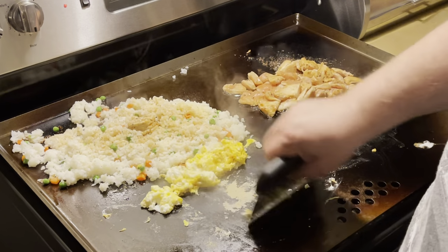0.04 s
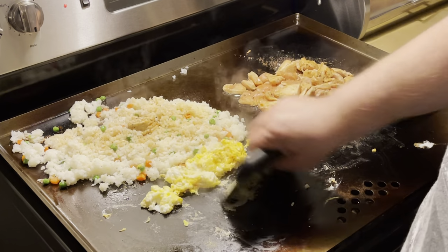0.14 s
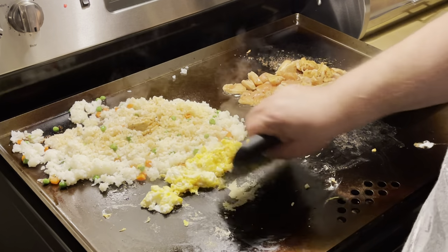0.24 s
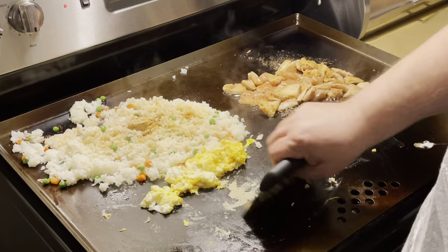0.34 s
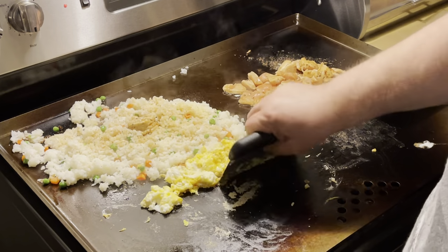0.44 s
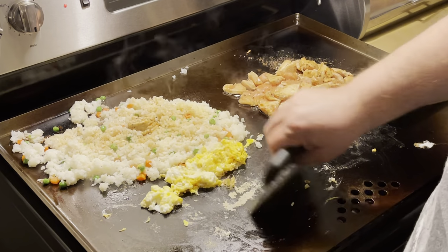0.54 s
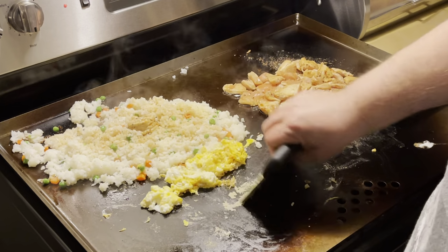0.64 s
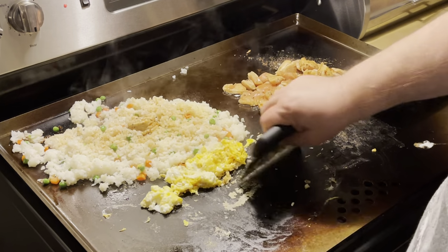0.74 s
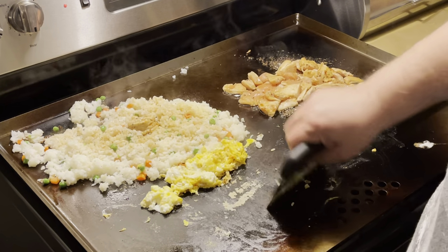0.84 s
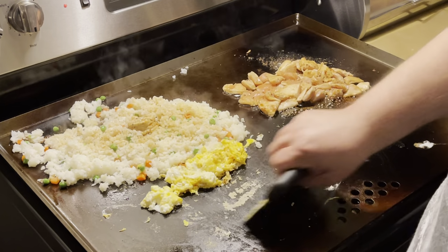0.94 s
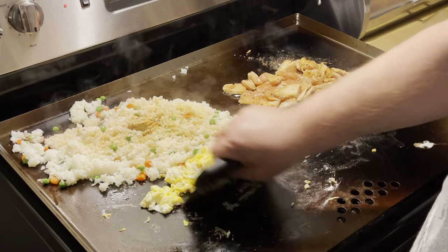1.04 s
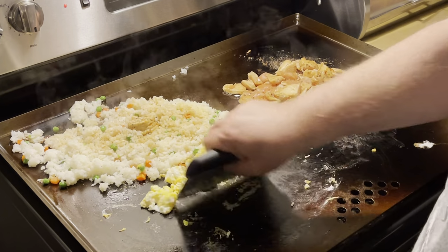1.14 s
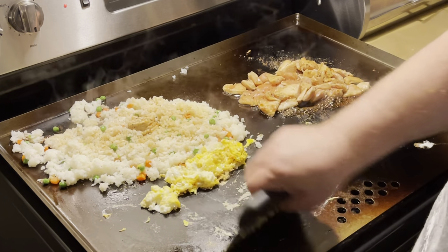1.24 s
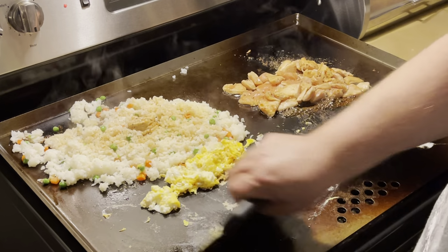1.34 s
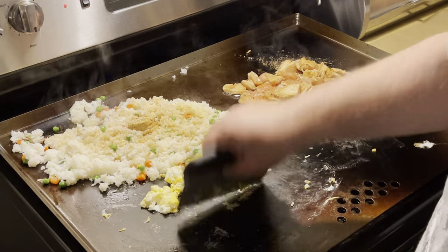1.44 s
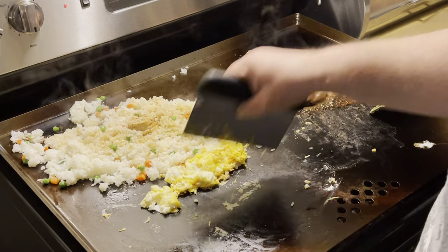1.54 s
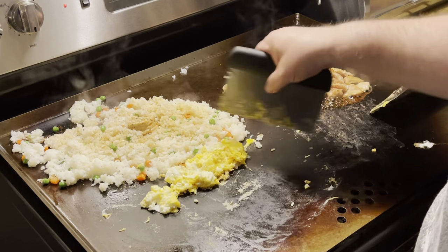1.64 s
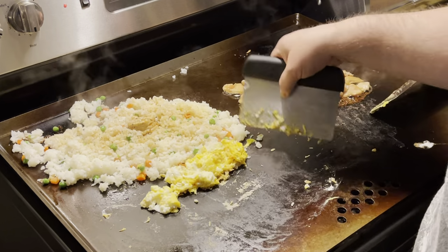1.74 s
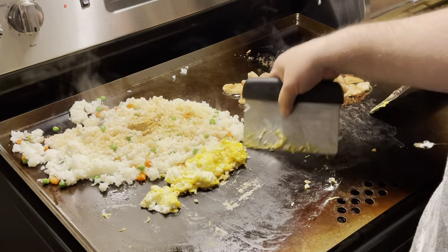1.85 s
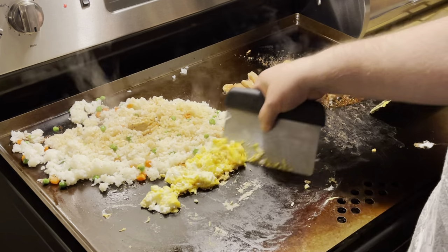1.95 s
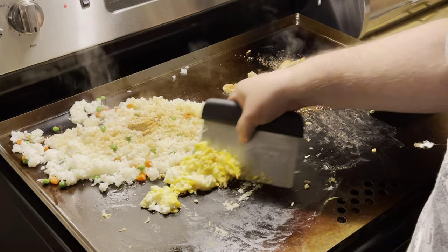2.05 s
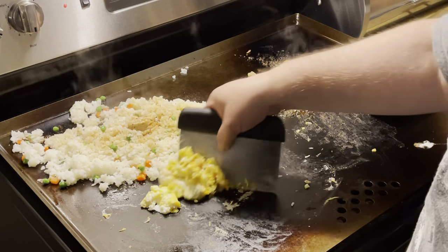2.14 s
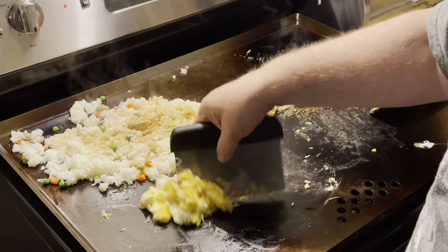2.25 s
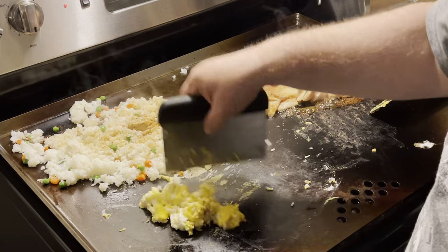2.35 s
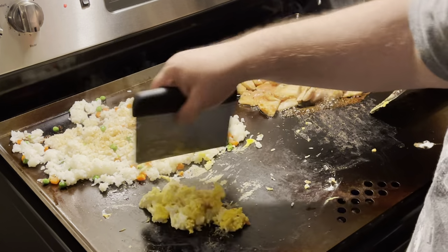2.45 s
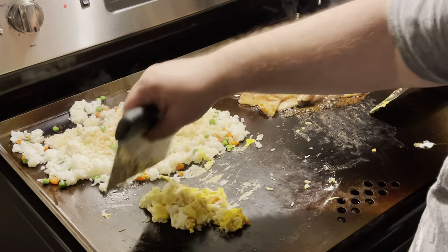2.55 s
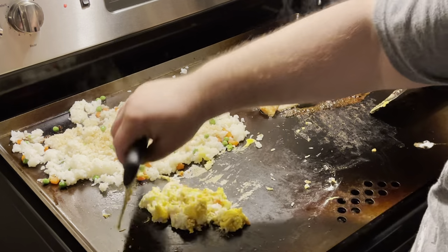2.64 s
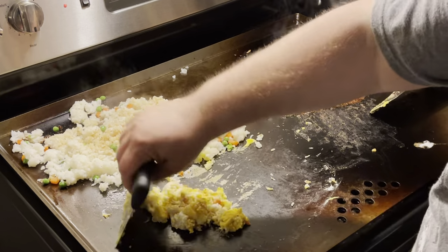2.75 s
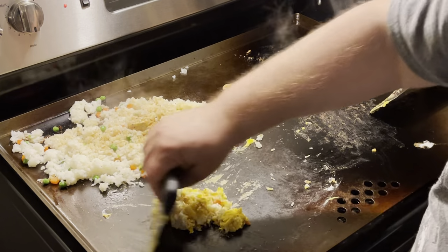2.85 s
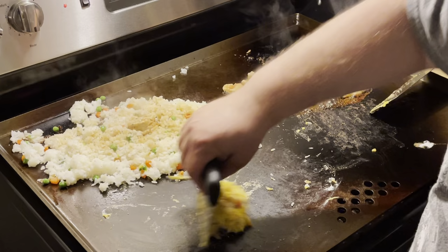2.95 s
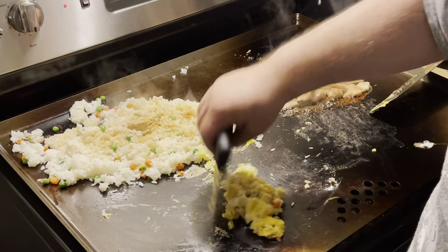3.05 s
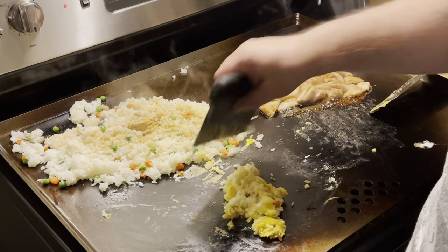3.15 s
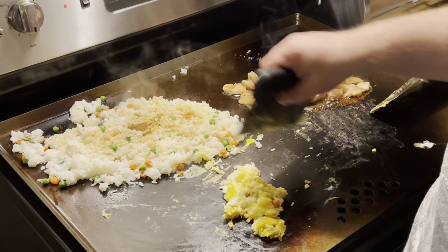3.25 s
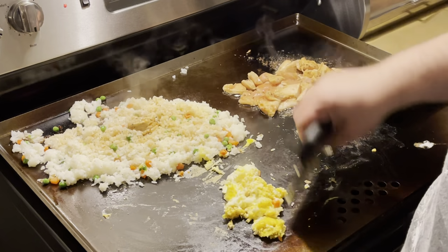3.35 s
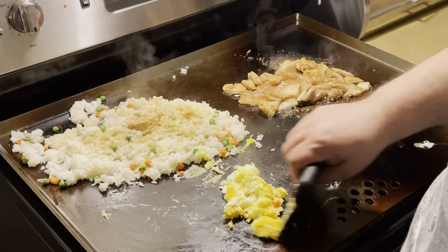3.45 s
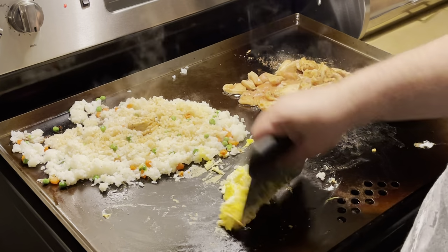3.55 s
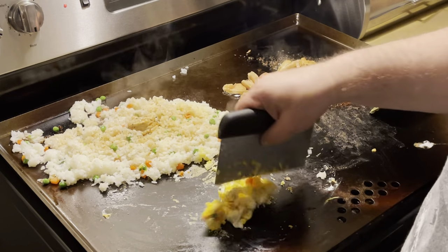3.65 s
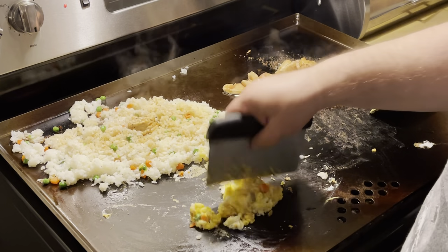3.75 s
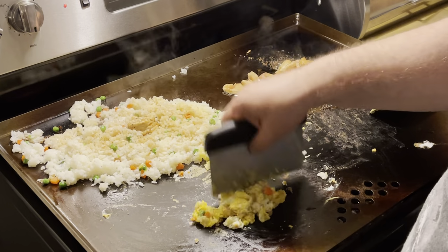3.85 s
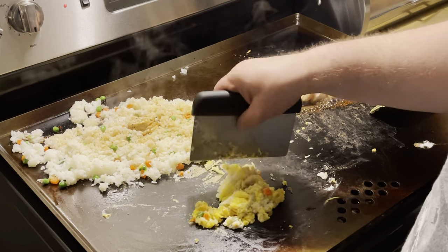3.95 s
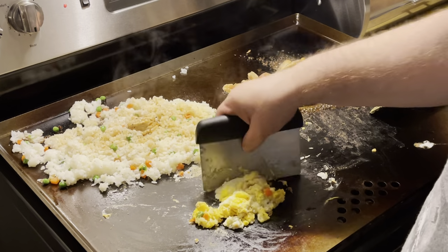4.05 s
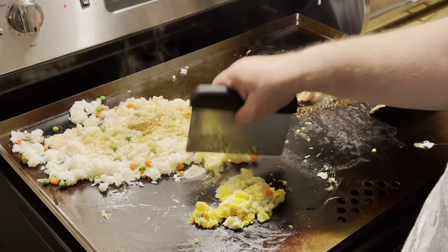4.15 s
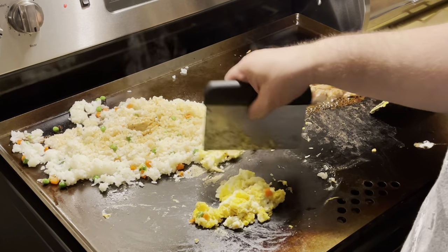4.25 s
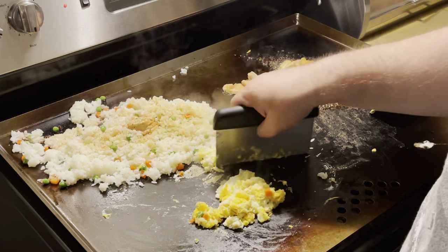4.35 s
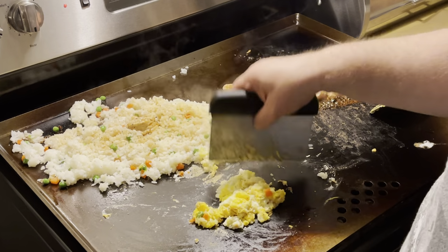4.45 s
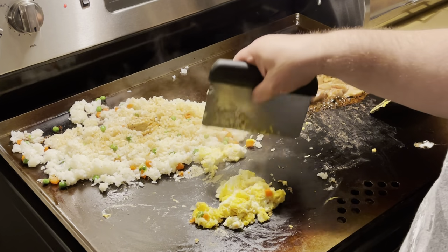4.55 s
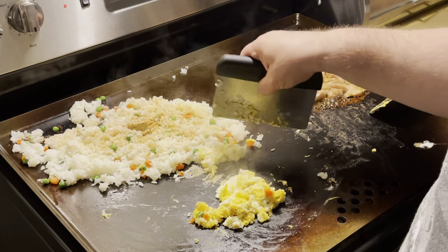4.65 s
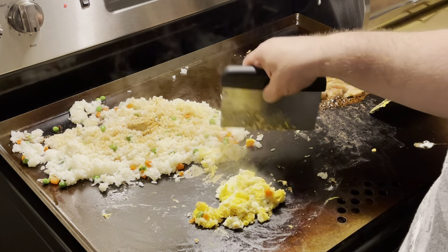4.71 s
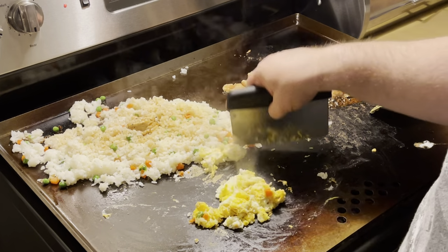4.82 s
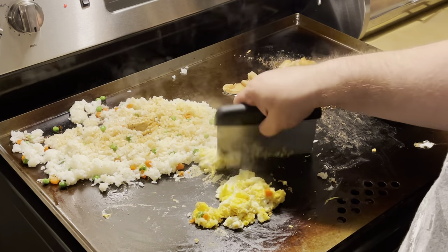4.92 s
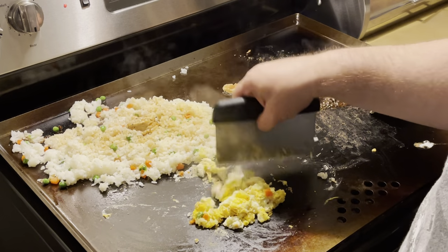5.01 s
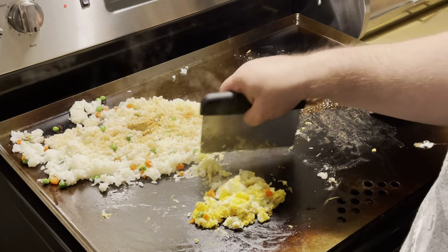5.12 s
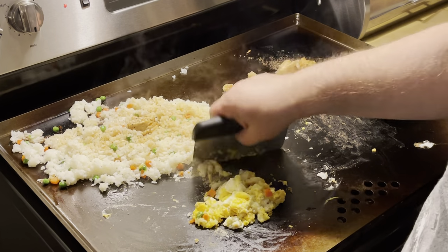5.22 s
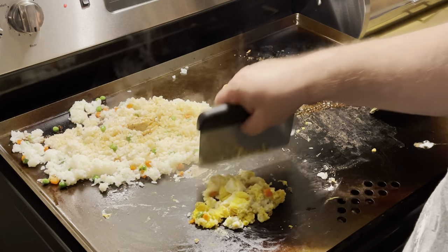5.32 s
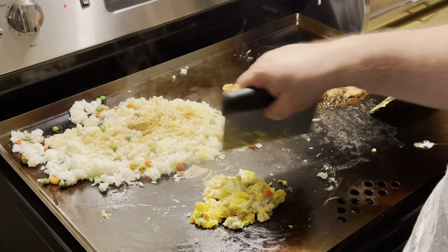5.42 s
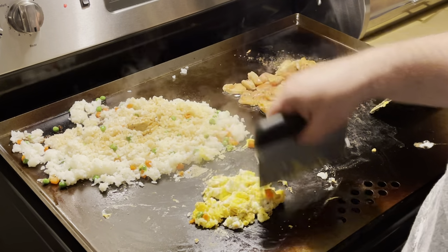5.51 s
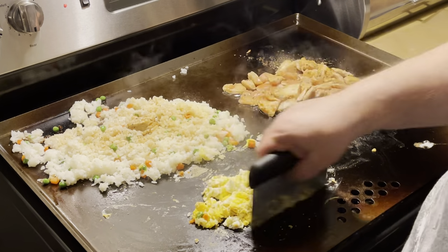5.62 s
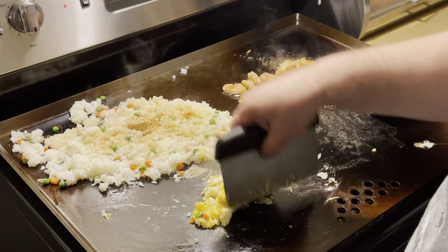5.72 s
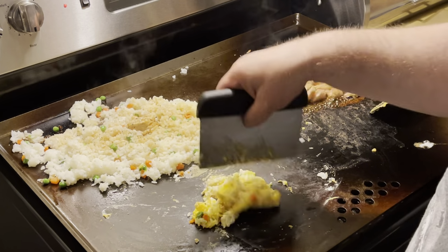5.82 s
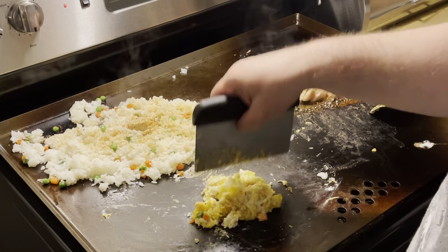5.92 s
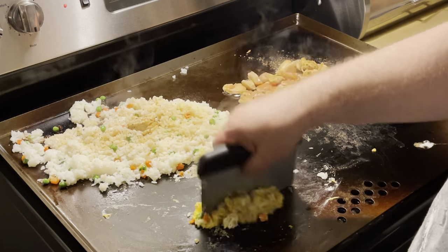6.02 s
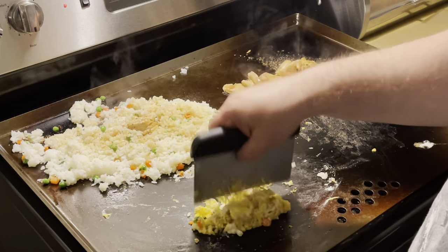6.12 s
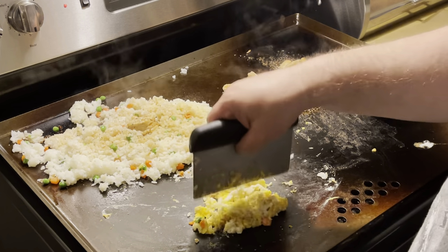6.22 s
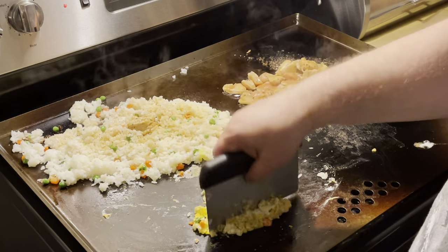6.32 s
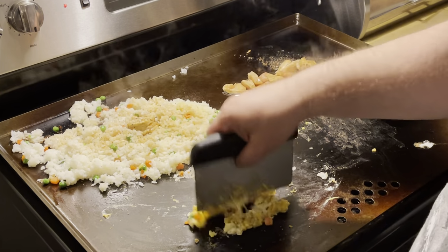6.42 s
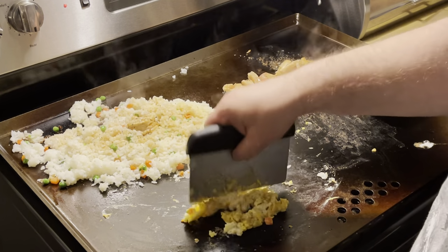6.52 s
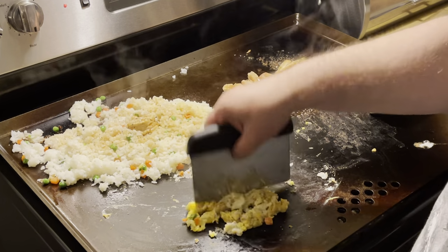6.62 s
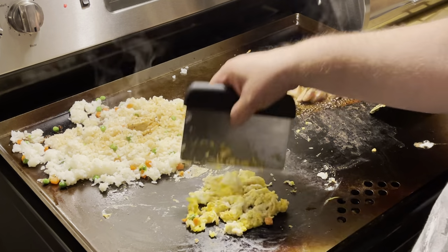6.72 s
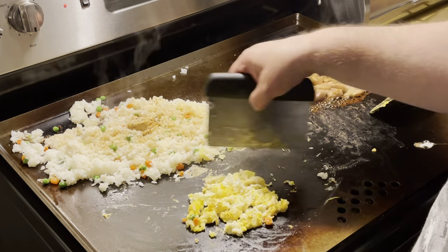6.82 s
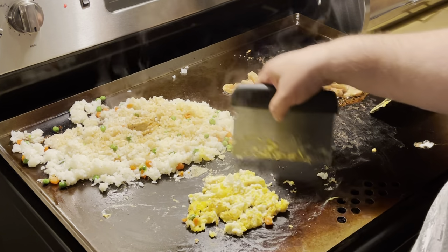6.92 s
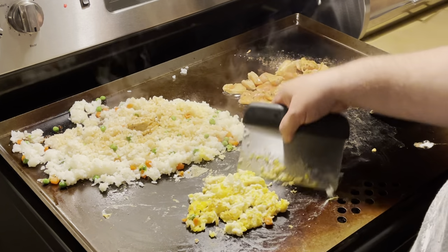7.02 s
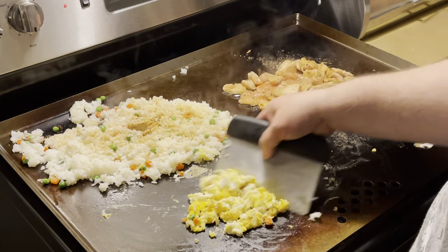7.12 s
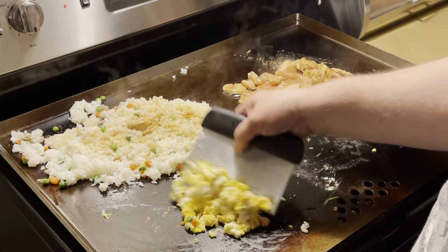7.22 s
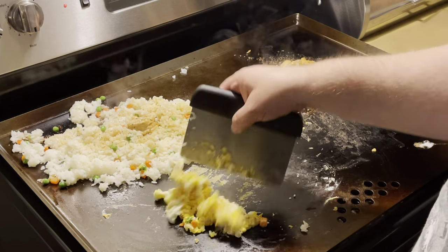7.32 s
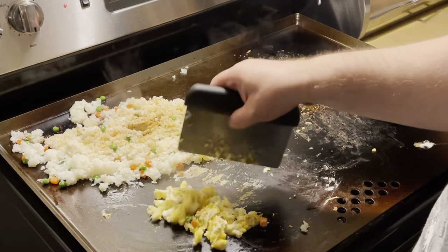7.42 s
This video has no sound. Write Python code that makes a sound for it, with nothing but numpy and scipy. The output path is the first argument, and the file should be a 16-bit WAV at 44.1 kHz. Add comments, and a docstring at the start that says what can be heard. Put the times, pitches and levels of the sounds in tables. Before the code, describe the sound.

Close up in a kitchen, a metal scraper taps and rasps on a hot steel griddle over a steady fine sizzle. Quick lighter chops and short scrapes come first, then a soft push through egg and a flare of frying. After a pause, much harder clanking chops follow at uneven intervals, some doubled, ending with one soft knock and push.

```python
"""A steel scraper chops, scrapes and pushes egg across a hot griddle, close by in a kitchen.
It opens with chops and short scrapes; pushes through egg, click trains in blade resonances, come near 2 s.
The sizzle, dense random clicks, flares as wet egg meets fresh hot steel, most at 2.25 s, and boils off.
From 3.4 to 6.6 s come the hardest chops: noise bands and dying modes, often twice as a corner lands first.
Gain control ducks the sizzle after the hardest; one soft chop and a push end it over fan and rumble."""
import sys
import numpy as np
from scipy import signal
from scipy.fft import rfft, irfft, next_fast_len
from scipy.io import wavfile
from scipy.ndimage import uniform_filter1d, minimum_filter1d

SR = 44100
rng = np.random.default_rng(int(sys.argv[2]) if len(sys.argv) > 2 else 0)


def unload_wav(signal):
    """Save mono or channel-first audio to the path in sys.argv[1] as 16-bit WAV at rate SR, clipped to [-1, 1]."""
    wavfile.write(
        sys.argv[1],
        SR,
        np.round(np.clip(np.atleast_2d(signal).T, -1, 1) * 32767).astype(np.int16),
    )


N = 329415  # samples, about 7.5 s
TIME = np.arange(N) / SR


def gain_of(db):
    """Decibels to an amplitude factor."""
    return 10 ** (np.asarray(db) / 20)


def evened(x):
    """Scales to rms 1."""
    return x / np.sqrt(np.mean(x ** 2) + 1e-20)


def read(points, hz):
    """Reads a (Hz, value) table on a log-frequency axis."""
    f, value = np.transpose(points)
    return np.interp(np.log(hz + 1), np.log(f + 1), value)


def level(curve):
    """A (s, dB) curve as a gain for every sample."""
    return gain_of(np.interp(TIME, *np.transpose(curve)))


def add(mix, s, sound):
    """Mixes a sound in at time s, cut off at the end of the mix."""
    part = mix[:, max(round(s * SR), 0):][:, :sound.shape[-1]]
    part += sound[..., :part.shape[-1]]


# stereo width: freq_hz, side_minus_mid_db
SPREAD = [(100, -28), (300, -11), (600, -9), (1400, -6), (2200, -23), (9000, -26.5), (13000, -27)]


def coloured(pair, spectrum):
    """Two unrelated signals become mid and side of a stereo sound of rms 1 with the given spectrum."""
    size = pair.shape[-1]
    padded = next_fast_len(size)
    hz = np.fft.rfftfreq(padded, 1 / SR)
    mid, side = rfft(pair, padded) * gain_of(read(spectrum, hz))
    side = side * gain_of(read(SPREAD, hz))
    left_right = np.array([mid + side, mid - side])
    return evened(irfft(left_right, padded)[:, :size])


def grains(per_s, scatter_db):
    """Two trains of tiny clicks at random times; scatter_db makes their sizes more uneven."""
    size = gain_of(scatter_db * np.minimum(rng.exponential(1, (2, N)), 5))
    height = size * rng.standard_normal((2, N))
    happens = rng.random((2, N)) < per_s / SR
    return evened(height * happens)


def waver(per_s):
    """Random drift of rms 1: straight lines between per_s chance values a second."""
    return evened(np.interp(TIME * per_s, np.arange(4000), rng.standard_normal(4000)))


def bands_of(x, count=18):
    """Splits a sound into overlapping bands that sum to it: (centre Hz, band) pairs."""
    centres = np.geomspace(60, 15000, count)
    hz, z = np.fft.rfftfreq(x.shape[-1], 1 / SR), rfft(x)
    pairs = []
    for c in centres:
        weight = read(list(zip(centres, centres == c)), hz)
        pairs.append((c, irfft(z * weight)))
    return pairs


# extractor fan spectrum: freq_hz, density_db (per Hz)
FAN = [(60, -7), (105, 0), (135, 13), (200, -15.5), (290, 5), (420, -7), (800, -6.5), (1500, -6.5),
       (4000, -12)]
# low kitchen rumble over time: time_s, level_db (before rumble_db)
RUMBLE = [(0.0, -58), (0.48, -50.5), (1.27, -55.5), (1.5, -70.5), (3.91, -56), (7.47, -72.5)]
# rumble spectrum: freq_hz, density_db (per Hz)
RUMBLE_SHAPE = [(15, -23), (32, -48), (50, 7.5), (75, -2.5), (105, -22), (200, 0), (600, -56)]


def background(fan_db=-55, rumble_db=2, flutter_db=2):
    """The steady air of the extractor fan and a fluttering rumble, both shaped noise."""
    fan = gain_of(fan_db) * coloured(rng.standard_normal((2, N)), FAN)
    rumble = coloured(rng.standard_normal((2, N)), RUMBLE_SHAPE) * level(RUMBLE)
    return fan + rumble * gain_of(rumble_db + flutter_db * waver(26))


# wet egg lands on fresh hot steel: start_s, level_db (before the fizz and spit gains)
FLARES = [(-0.2, -50), (1.45, -52), (1.9, -51.5), (2.25, -46.8), (3.5, -51), (4.05, -53), (7.0, -54)]
SIMMER_DB, FLARE_RISE_S, BOIL_OFF_DB_PER_S = -53.1, .16, 6  # simmer also before those gains


def boiling():
    """How hard the food fries: a steady simmer plus flares that rise quickly and boil off slowly."""
    power = gain_of(SIMMER_DB) ** 2
    for start_s, level_db in FLARES:
        age = np.maximum(TIME - start_s, 0)
        rise = np.minimum(age / FLARE_RISE_S, 1)
        boil_off = gain_of(level_db - BOIL_OFF_DB_PER_S * (age - FLARE_RISE_S))
        power = power + rise * boil_off ** 2
    return np.sqrt(power)


# spectrum of tiny sharp bursts, for sizzle, pops and chop ticks: freq_hz, density_db (per Hz)
FRYING = [(300, -9.5), (1000, -16), (1900, -6.5), (2900, -3), (3800, -4.5), (6000, -2.5), (8500, -1),
          (11000, 5.5), (12000, 0.5), (13000, -40), (15500, -59), (16000, -57)]


def sizzle(fizz_db=5.0, spit_db=-9):
    """A fine fizz of bursting steam bubbles with sparser spits of fat."""
    fizz = gain_of(fizz_db) * coloured(grains(per_s=14000, scatter_db=0.0), FRYING)
    spits = gain_of(spit_db) * coloured(grains(per_s=530, scatter_db=1.0), FRYING)
    return (fizz + spits) * boiling() * gain_of(0.14 * waver(25))


# single pops of hot fat: start_s, level_db
POPS = [(2.1042, -27), (2.696, -28.5), (4.653, -27), (5.565, -30.5)]


def pops(decay_s=0.0021, size=2000):
    """A drop of fat bursts with a short bright tick of dying noise."""
    out = np.zeros((2, N))
    decay = np.exp(-np.arange(size) / SR / decay_s)
    for start_s, level_db in POPS:
        burst = coloured(rng.standard_normal((2, size)), FRYING)
        add(out, start_s, gain_of(level_db) * burst * decay)
    return out


def stroke(start_s, length_s, level_db, lean):
    """The hand speeds up and slows down in one arch; a lean under 1 brings the peak early."""
    progress = np.clip((TIME - start_s) / length_s, 0, 1)
    return gain_of(level_db) * np.sin(np.pi * progress ** lean)


def resonate(x, hz, width):
    """Shifts the curve hz down to zero, smooths, and shifts back: a moving resonance of gain 1."""
    turn = np.exp(2j * np.pi * np.cumsum(hz) / SR)
    r = np.exp(-np.pi * width / SR)
    smooth = signal.lfilter([1 - r], [1, -r], x / turn + 1e-18)
    return 2 * (turn * smooth).real


HUM_HZ, HUM_T60 = 433.5, .34  # low hum heard in slides and chops; t60 in s


def slide(strokes, spectrum, resonances, lean, catches_per_s, scatter_db, judder_db, ring_db, hum_db):
    """The edge judders and catches on specks; blade resonances wander and swell as the contact shifts."""
    force = np.sqrt(sum(stroke(*row, lean) ** 2 for row in strokes))
    catches = coloured(grains(catches_per_s, scatter_db), spectrum)
    rasp = catches * force * gain_of(judder_db * waver(110))
    wander, swell_db = .03, 3  # wander as a share of the resonance frequency
    blade = 0
    for hz, width_hz, level_db in resonances:
        swell = gain_of(level_db + swell_db * waver(22.07))
        moving_hz = hz * (1 + wander * waver(30))
        blade = blade + swell * resonate(rasp, moving_hz, width_hz)
    hum_width_hz = np.log(1000) / np.pi / HUM_T60
    hum = resonate(rasp, np.full(N, HUM_HZ), hum_width_hz)
    return rasp + gain_of(ring_db) * blade + gain_of(hum_db) * hum


# the edge sliding on a cushion of egg: start_s, length_s, level_db (before the -5.5 dB trim)
PUSHES = [(1.925, 0.23, -35), (2.09, 0.2, -38), (6.98, 0.19, -37)]
# rub on egg, spectrum: freq_hz, density_db (per Hz)
RUB = [(50, -10), (150, 3), (240, -4.5), (450, 1.5), (850, -6), (1500, -8.5), (3000, -5.5), (8000, -28)]
# resonances of the blade bedded in egg: freq_hz, width_hz, level_db (before ring_db and the trim)
BEDDED = [(160, 22, -1), (445, 23, -22), (810, 490, -5)]


def pushes():
    """Egg under the edge: sparser catches, a dull rub and low blade resonances."""
    return gain_of(-5.5) * slide(PUSHES, RUB, BEDDED, lean=.7, catches_per_s=3000,
                                 scatter_db=.8, judder_db=1.6, ring_db=4, hum_db=0)


# the edge sliding on bare steel: start_s, length_s, level_db (before the -4.3 dB trim)
SCRAPES = [(0.105, 0.11, -23.8), (0.945, 0.16, -25.8), (1.315, 0.13, -26), (1.935, 0.075, -41.5),
           (2.8, 0.13, -29.3), (2.885, 0.13, -26.2)]
# rasp on bare steel, spectrum: freq_hz, density_db (per Hz)
RASP = [(60, -32), (150, 9), (280, -12.5), (450, 6), (1400, -2), (3200, 2), (5800, -4), (7000, -1),
        (9500, 1), (11500, 3.5), (13000, -15), (16000, -88)]
# resonances of the pressed-down blade: freq_hz, width_hz, level_db (before ring_db and the trim)
PRESSED = [(1160, 120, -12), (2140, 180, -5.5), (3020, 230, -2.5), (3670, 230, -3.5), (5070, 290, 4.5),
           (5800, 290, 2), (7600, 400, -10)]


def scrapes():
    """Bare steel under the edge: dense catches, a bright rasp and high blade resonances."""
    return gain_of(-4.3) * slide(SCRAPES, RASP, PRESSED, lean=.9, catches_per_s=12000,
                                 scatter_db=.8, judder_db=1.16, ring_db=7, hum_db=3)


def bloom(t, hz, cycles=3.32):
    """Bending waves are slow in the bass: low notes take a few cycles to build up."""
    return 1 - np.exp(-(t * hz / cycles) ** 2)


def note(t, hz, t60):
    """One dying mode."""
    return bloom(t, hz) * gain_of(-60 * t / t60) * np.sin(2 * np.pi * (hz * t + rng.random()))


# ringing of the griddle with the blade on it: freq_hz, level_db (before colour and scatter), t60_s
MODES_OF_STEEL = [(156.4, -2, 0.26), (298.7, -8, 0.26), (500, -2, 0.059), (642.7, -3, 0.19),
                  (690.2, 0.5, 0.18), (883, 5, 0.096), (950, -2, 0.15), (1191, 3, 0.15), (1610, -20, 0.16),
                  (1694, -5, 0.18), (1884, 2.5, .13), (2143, 0, 0.18), (2215, 1.5, 0.12), (2338, -6, 0.33),
                  (2696, -7, 0.27), (2827, -2.5, 0.18), (3080, 7, 0.085), (3120, -14, .09),
                  (3550, 1.5, 0.077), (3710, -2.5, 0.11), (4110, 1, 0.079), (4740, -22, 0.1),
                  (4690, 4.5, 0.087), (5570, -1.5, 0.092)]
MODE_SCATTER_DB = 3


def steel(t, colour):
    """The modes ring with strengths and phases that depend on where the edge touches."""
    hz, db, t60 = np.transpose(MODES_OF_STEEL)[:, :, None]
    spot, turn = rng.standard_normal(hz.shape), rng.random(hz.shape)
    height = gain_of(db + read(colour, hz) + MODE_SCATTER_DB * spot - 60 * t / t60)
    modes = height * bloom(t, hz, cycles=5.7) * np.sin(2 * np.pi * (hz * t + turn))
    return modes.sum(0)


# the crowd of short-lived modes in a chop: freq_hz, density_db (per Hz)
CLANK = [(40, -19), (90, -16.5), (150, -8), (230, -6.5), (450, 1), (1300, -3.5), (2600, -1.5), (4500, -3.5),
         (6800, -10), (9500, -12), (11500, -7.5), (13000, -29.5), (16000, -51)]
# how long that crowd rings: freq_hz, t60_s
CLANK_T60 = [(100, 0.41), (300, 0.15), (900, 0.16), (2500, .11), (6000, 0.14), (12000, 0.11)]
RING_T60 = .11  # s, the blade's single note


def contact(strength_db, thud_db, body_db, edge_db, hum_db, ring_hz, clank_db=4, modes_db=-14.5,
            ring_db=-6, tick_db=-12, tick_s=0.00077, crack_db=-2, crack_s=0.0013, size=18000):
    """One contact: a sharp tick, a dense clank, the lasting modes, one note of the blade and the low hum."""
    t = np.arange(size) / SR
    # food under the edge lengthens the contact: more body, and the treble falls from a lower knee
    knee_hz = np.clip(4200 * 2 ** (-body_db / 13), 2800, 4900)
    colour = [(170, thud_db), (400, body_db), (900, body_db), (2000, 0), (knee_hz, 0), (1.8 * knee_hz, edge_db)]
    crowd = coloured(rng.standard_normal((2, size)), CLANK)
    clank = 0
    for hz, band in bands_of(crowd):
        fade_db = read(colour, hz) - 60 * t / read(CLANK_T60, hz)
        clank = clank + band * bloom(t, hz) * gain_of(fade_db)
    # a brief extra push at the very start of the clank
    crack = 1 + gain_of(crack_db) * np.exp(-t / crack_s)
    clank = gain_of(clank_db) * clank * crack / np.sqrt(2)
    burst = coloured(rng.standard_normal((2, size)), FRYING)
    tick = gain_of(tick_db + edge_db) * burst * np.exp(-t / tick_s)
    blade = gain_of(ring_db) * note(t, ring_hz, RING_T60)
    modes = gain_of(modes_db) * steel(t, colour)
    hum = gain_of(hum_db) * note(t, HUM_HZ, HUM_T60)
    return gain_of(strength_db) * (tick + clank + modes + blade + hum)


# one row a chop: start_s, strength_db, thud_db, body_db, edge_db (treble), hum_db, ring_hz (blade note)
# and, where a corner lands first, the rest of the edge: later_s, more_db (against the corner)
CHOPS = [(0.0715, -18.7, 1.5, 3.5, 3, -10, 1669, 0.013, 7),
         (0.3405, -15, 7, -3.5, 3.5, -11, 2900, 0.007, 3.5),
         (0.5815, -23, 6, -6, 3.5, -12, 2850, 0.0453, 10.5),
         (0.871, -25, 6.5, 0.5, 4, -7.5, 3500, 0.0085, 8), (1.2582, -22, 10.5, 2, 8.5, -2, 2080),
         (1.866, -27, 10, 4, -5, -9.5, 1673), (2.735, -22.5, 9, 1.5, 6, -9, 4840),
         (3.4175, -15, 3, -1.5, -4.5, -11.5, 3480, 0.0145, 10), (3.812, -6.5, -4.5, -3, -12, -17, 2143),
         (4.0512, -11.3, 6, 2.5, -4, -15, 2286), (4.3403, -4, -7, -5, -13, -30, 4078, 0.0152, -2),
         (4.847, -17.5, 4, 3.5, -30, -11, 2990), (4.89, -10, -1.5, -3, -4.5, -20, 3190),
         (5.1925, -12.7, 3, 4.5, -11, -9.5, 2215, 0.0335, -9),
         (5.608, -6.3, -9, -7.5, -5.5, -32, 2342, 0.011, -0.5),
         (6.0265, -6.5, -2, -6, -13, -30, 4120, 0.0145, -3), (6.342, -17, -6, -2.5, -14.5, -14.5, 3674),
         (6.575, -15.5, 1, -3, -19, -11, 2670), (6.978, -26.5, 21, 8, 4.5, -3, 2237, 0.048, -10)]


def chops():
    """The edge lands flat, or a corner first and the rest a moment later with the same colour."""
    out = np.zeros((2, N))
    for start_s, strength_db, thud_db, body_db, edge_db, hum_db, ring_hz, *rest in CHOPS:
        tone = thud_db, body_db, edge_db, hum_db, ring_hz
        add(out, start_s, contact(strength_db, *tone))
        if rest:
            later_s, more_db = rest
            add(out, start_s + later_s, contact(strength_db + more_db, *tone))
    return out


def kitchen(x, wet_db=-11, bass_t60=0.4, treble_t60=0.25, delay_s=0.005, size=22000):
    """A short room tail of decaying noise that dies sooner in the treble."""
    t = np.arange(size) / SR
    air = coloured(rng.standard_normal((2, size)), [(100, -8.5), (4000, -3), (12000, -4)])
    t60 = [(200, bass_t60), (6000, treble_t60)]
    tail = sum(band * gain_of(-60 * t / read(t60, hz)) for hz, band in bands_of(air))
    tail = tail * (1 - np.exp(-(t / delay_s) ** 2))  # soft onset
    wet = signal.oaconvolve(x, tail / np.linalg.norm(tail[0]), axes=1)[:, :N]
    return x + gain_of(wet_db) * wet


def scene():
    """The scraper and pops in the room, over the frying and the background."""
    return background() + sizzle() + kitchen(pops() + pushes() + scrapes() + chops())


# the two microphone ports: freq_hz, left_lead_rad
PORTS = [(0, 0), (2000, 0), (3100, .7), (5000, .5), (6400, .05), (7500, .05), (8000, .5), (8750, 0),
         (9250, -1.6), (10250, -3.14), (12100, -6.28), (12700, -7.1), (13500, -9.4), (14200, -10),
         (14900, -12.5)]


def ports(x):
    """The two microphone ports hear the treble out of step."""
    padded = next_fast_len(N + SR)
    lead = np.interp(np.fft.rfftfreq(padded, 1 / SR), *np.transpose(PORTS))
    turn = np.exp(1j * np.array([lead, 0 * lead]))
    return irfft(rfft(x, padded) * turn, padded)[:, :N]


def limiter(x, size=45):
    """Turns the gain down for about a millisecond around every peak above the ceiling."""
    ceiling = .92
    gain = ceiling / np.maximum(abs(x).max(0), ceiling)
    return x * uniform_filter1d(minimum_filter1d(gain, size), size)


SQUEEZE, THRESHOLD_DB = .8, -13.5  # share of the excess dB taken off; level where ducking starts
ATTACK_S, HOLD_S, CUTOFF_HZ = .009, .12, 16000


def record(dry, recovery_db_per_s=110):
    """Gain control that holds and recovers, a peak limiter, then the band limit."""
    x = ports(dry)
    power = signal.lfilter(np.ones(256) / 256, 1, (x ** 2).mean(0))
    over_db = np.maximum(10 * np.log10(power + 1e-12) - THRESHOLD_DB, 0)
    # each excess is held for HOLD_S, then falls in a straight line of dB
    hold = 2 * int(HOLD_S * SR / 2) + 1
    held_db = -minimum_filter1d(-over_db, hold, origin=hold // 2, mode="constant")
    fall = TIME * recovery_db_per_s  # before SQUEEZE
    duck_db = SQUEEZE * (np.maximum.accumulate(held_db + fall) - fall)
    lag = np.exp(-1 / (ATTACK_S * SR))
    smooth_duck_db = signal.lfilter([1 - lag], [1, -lag], duck_db)
    x = limiter(x / gain_of(smooth_duck_db))
    lowpass = signal.firwin(255, CUTOFF_HZ, window=("kaiser", 9), fs=SR)
    return signal.oaconvolve(x, lowpass[None], "same")


dry = scene()
out = record(dry)
unload_wav(out)
```